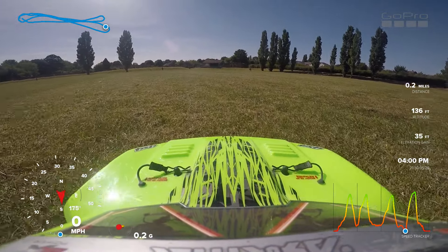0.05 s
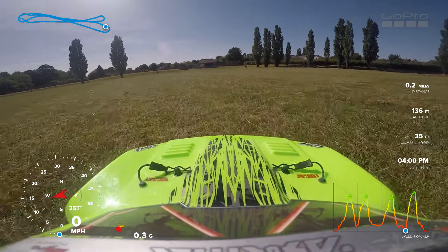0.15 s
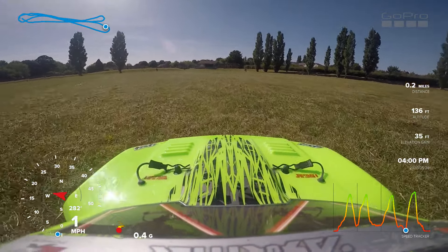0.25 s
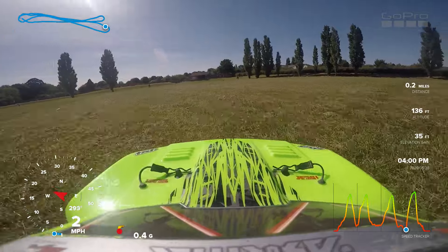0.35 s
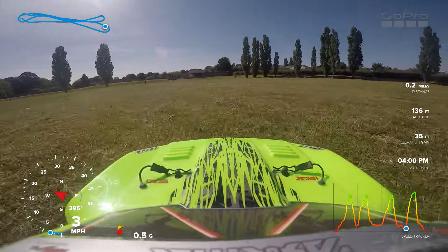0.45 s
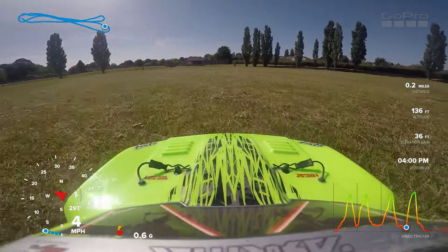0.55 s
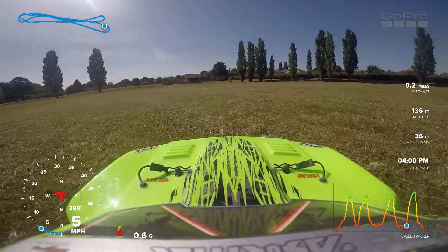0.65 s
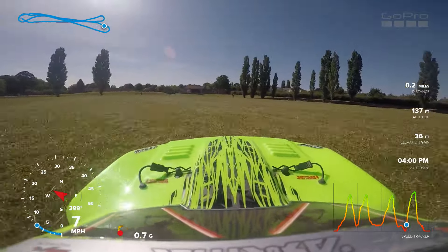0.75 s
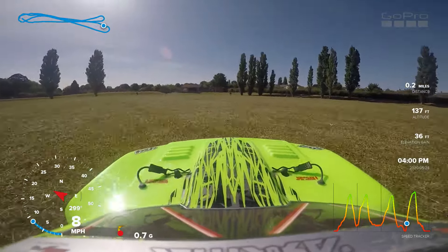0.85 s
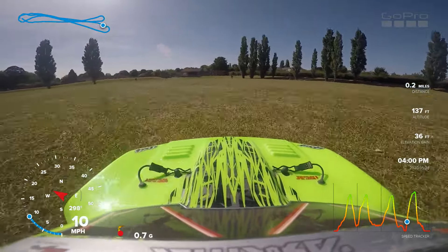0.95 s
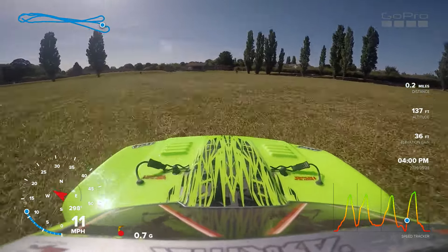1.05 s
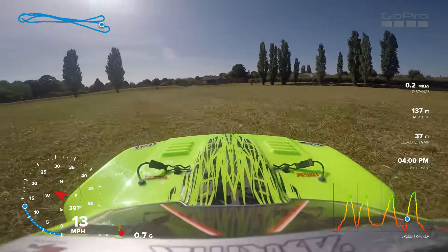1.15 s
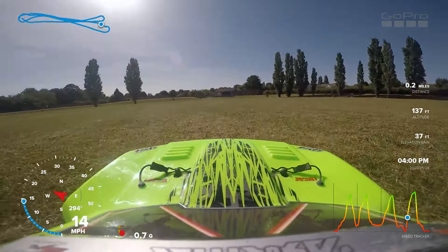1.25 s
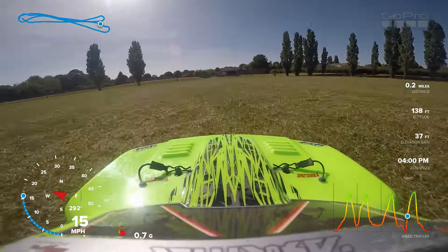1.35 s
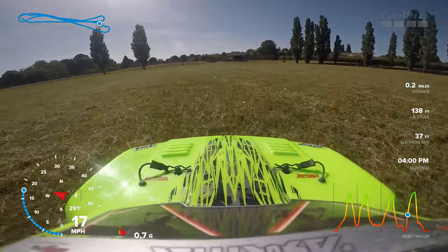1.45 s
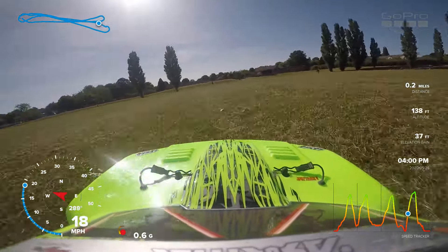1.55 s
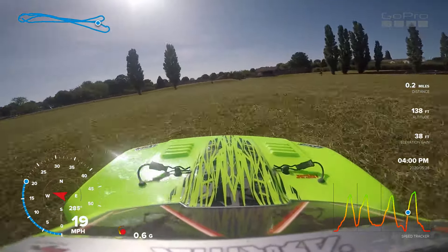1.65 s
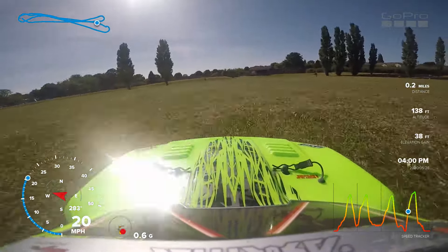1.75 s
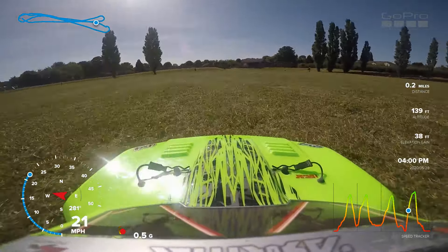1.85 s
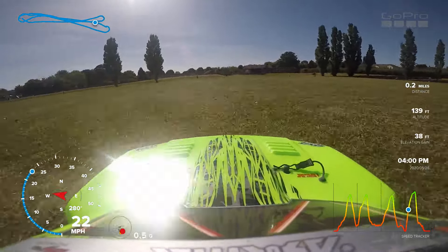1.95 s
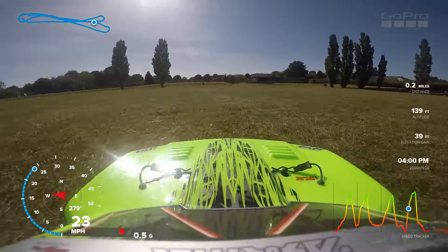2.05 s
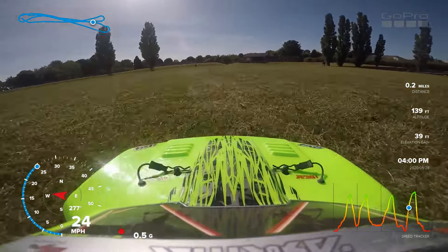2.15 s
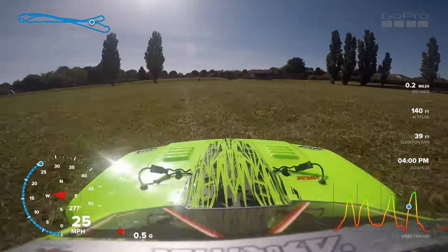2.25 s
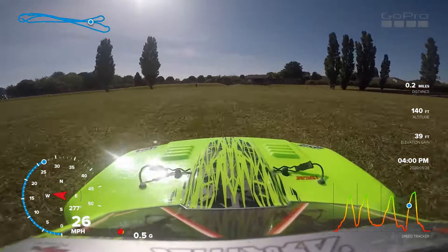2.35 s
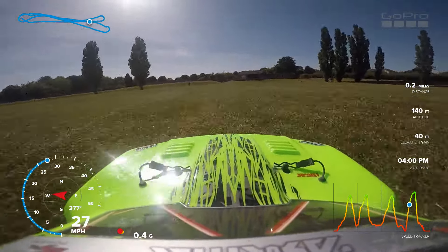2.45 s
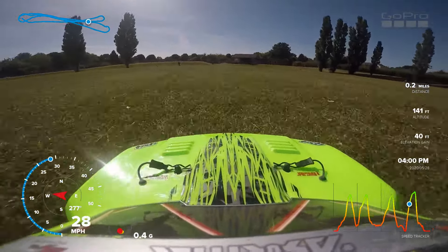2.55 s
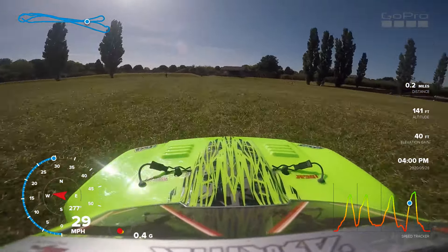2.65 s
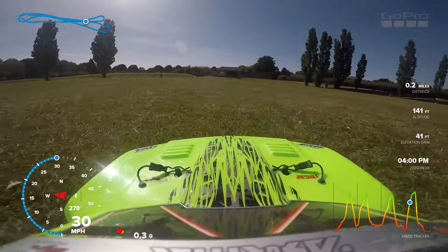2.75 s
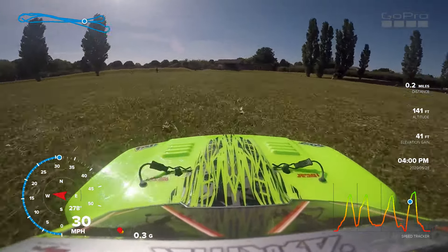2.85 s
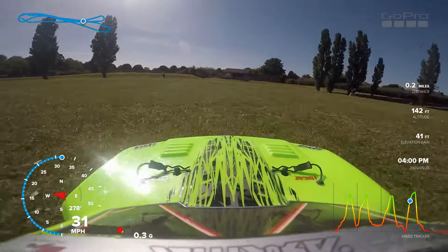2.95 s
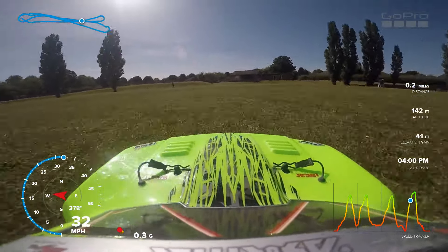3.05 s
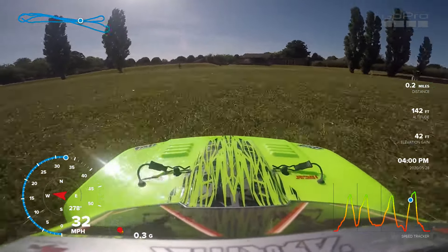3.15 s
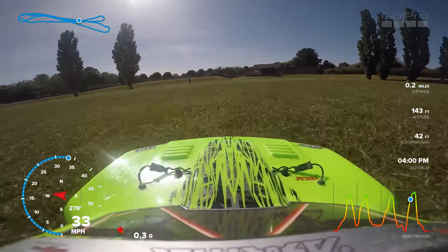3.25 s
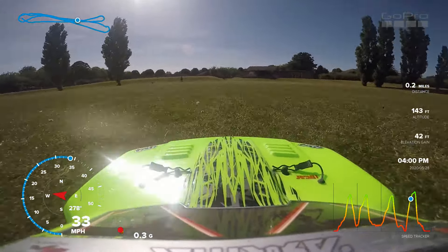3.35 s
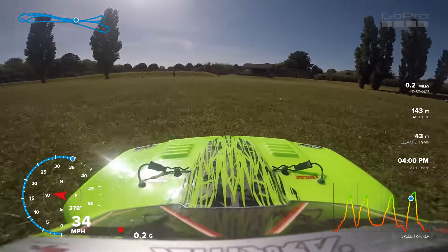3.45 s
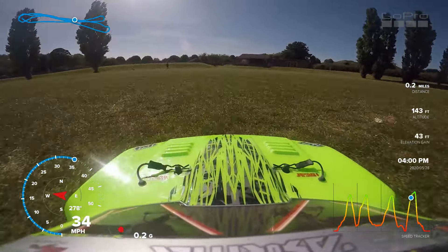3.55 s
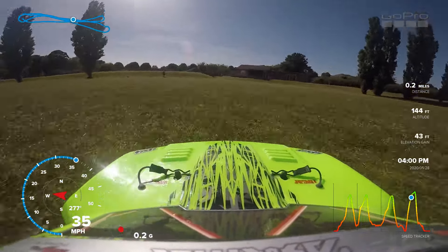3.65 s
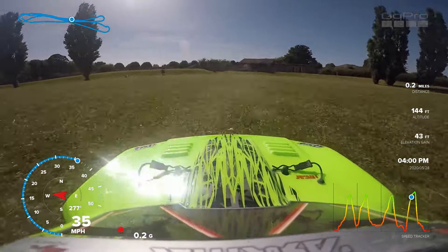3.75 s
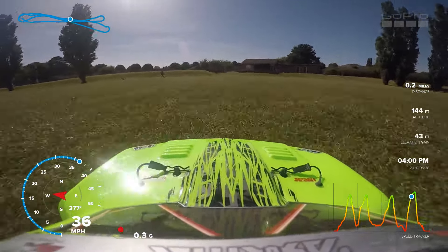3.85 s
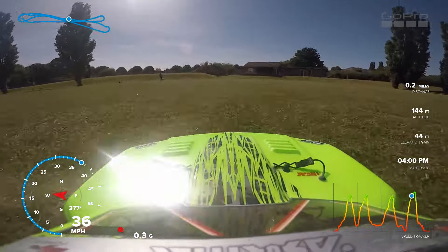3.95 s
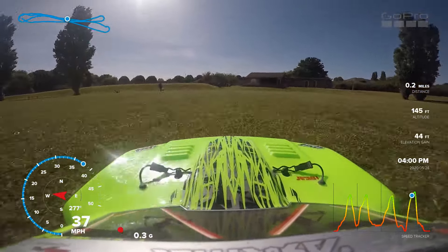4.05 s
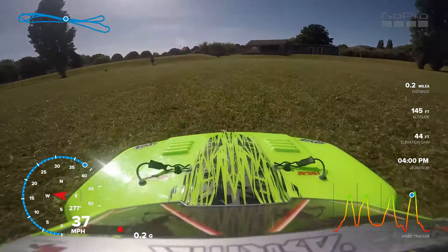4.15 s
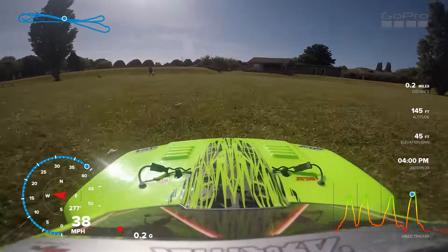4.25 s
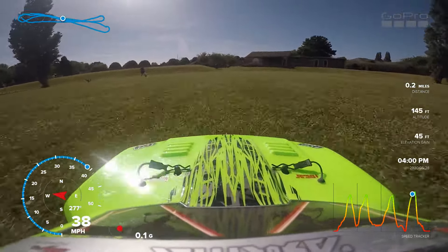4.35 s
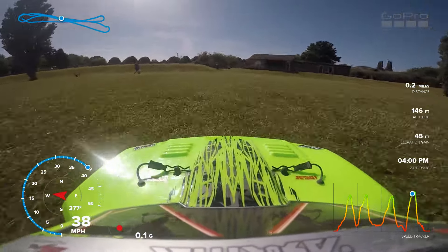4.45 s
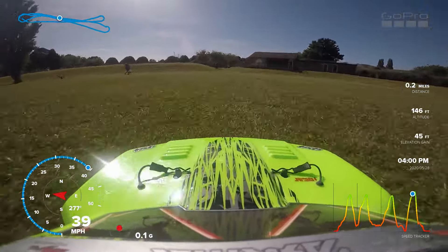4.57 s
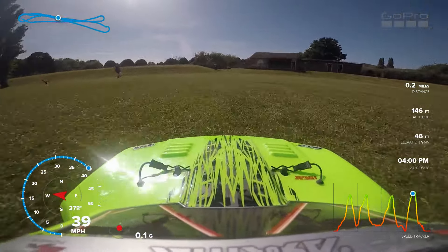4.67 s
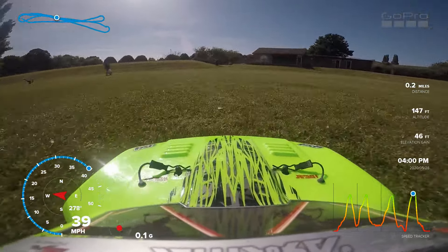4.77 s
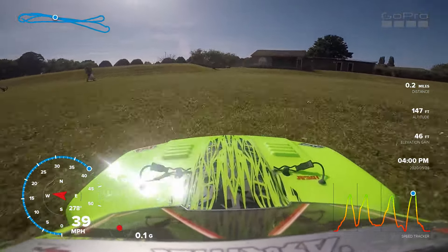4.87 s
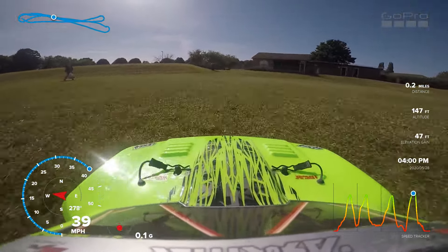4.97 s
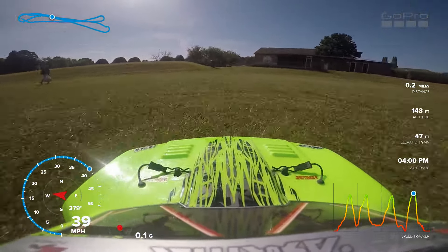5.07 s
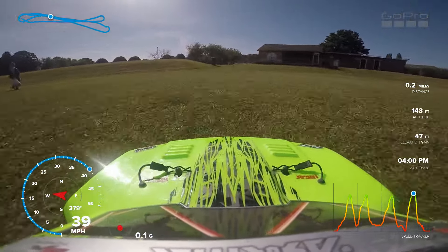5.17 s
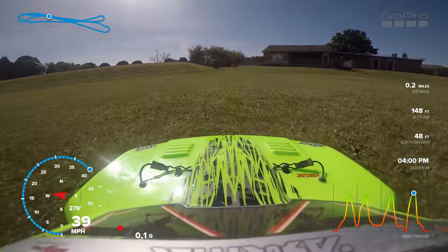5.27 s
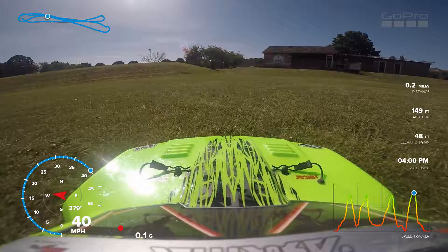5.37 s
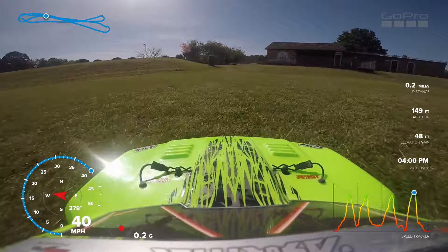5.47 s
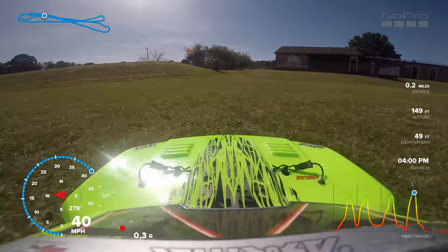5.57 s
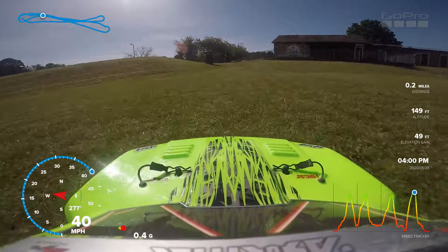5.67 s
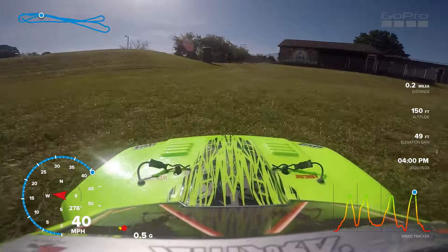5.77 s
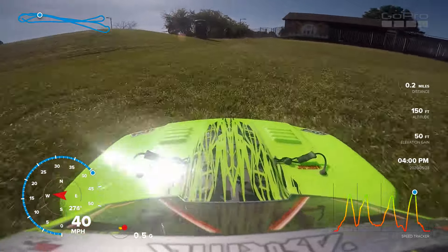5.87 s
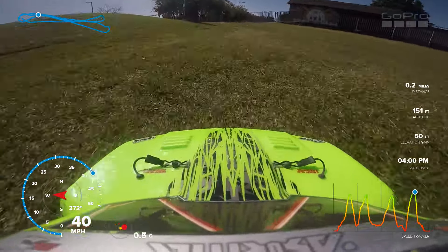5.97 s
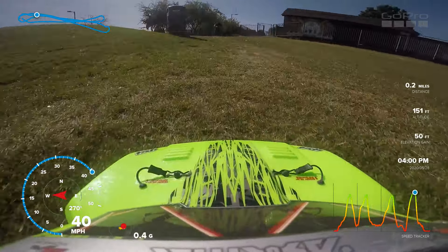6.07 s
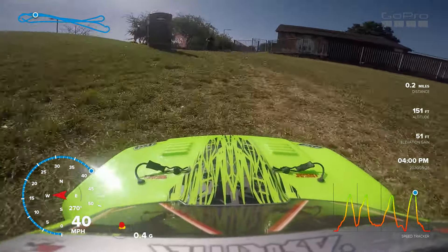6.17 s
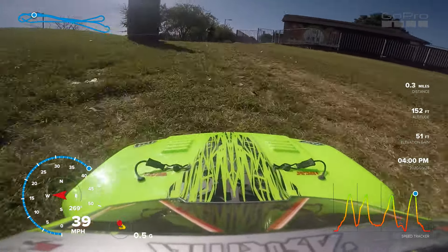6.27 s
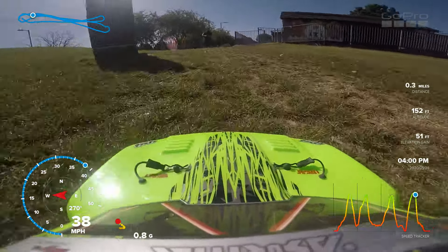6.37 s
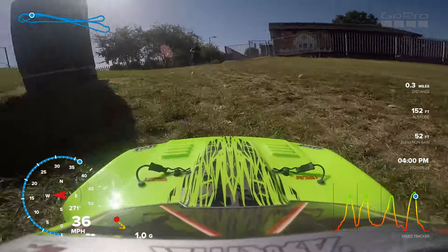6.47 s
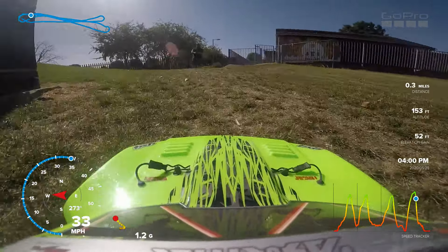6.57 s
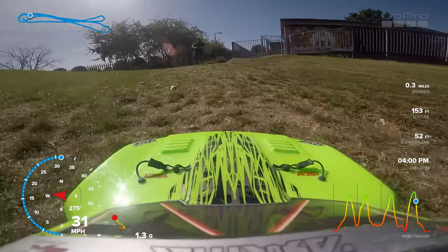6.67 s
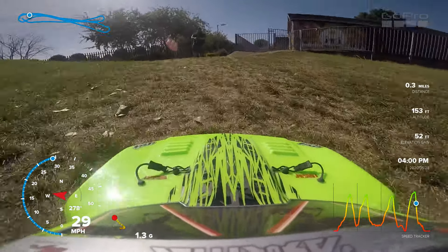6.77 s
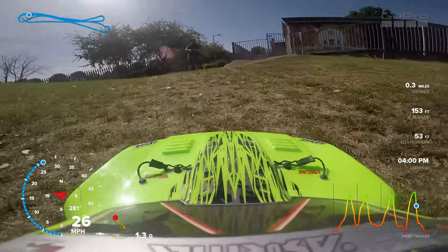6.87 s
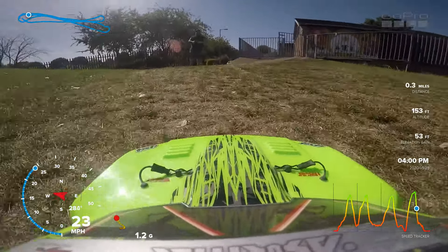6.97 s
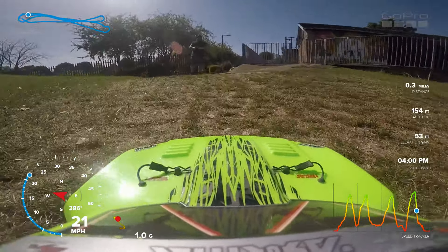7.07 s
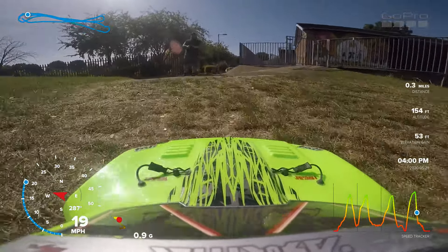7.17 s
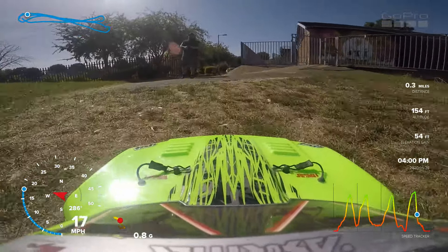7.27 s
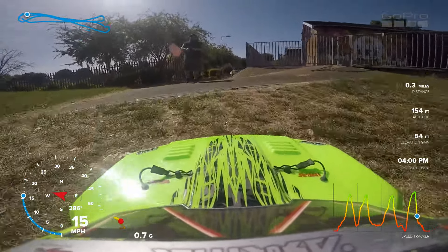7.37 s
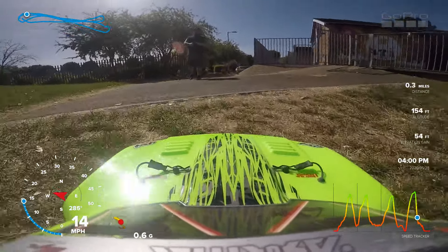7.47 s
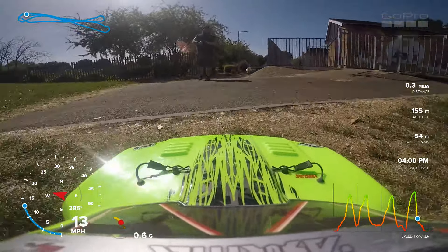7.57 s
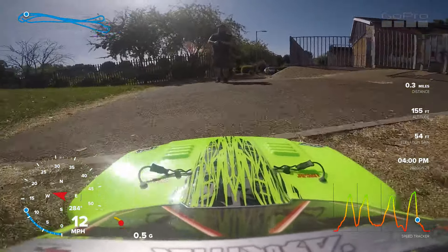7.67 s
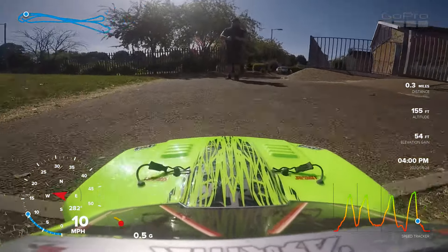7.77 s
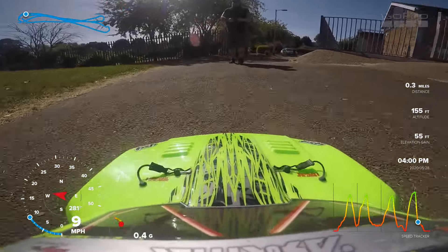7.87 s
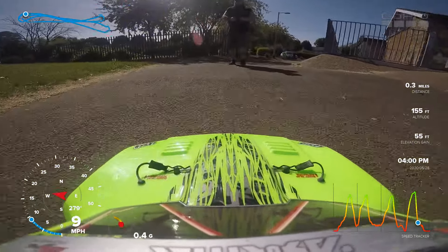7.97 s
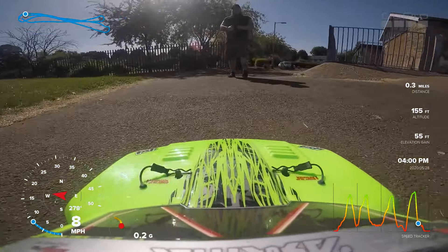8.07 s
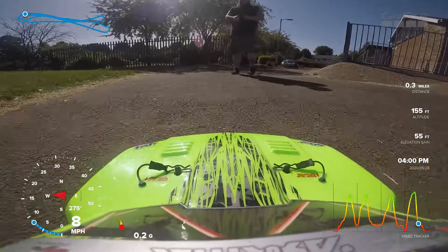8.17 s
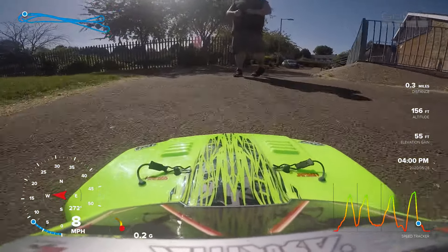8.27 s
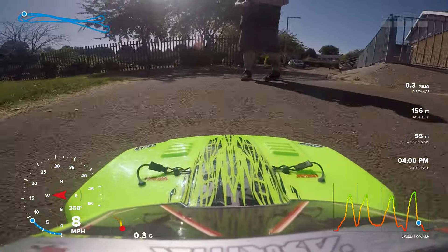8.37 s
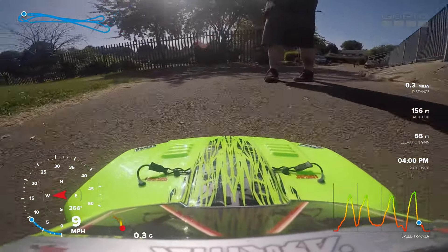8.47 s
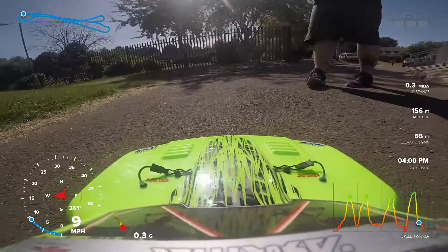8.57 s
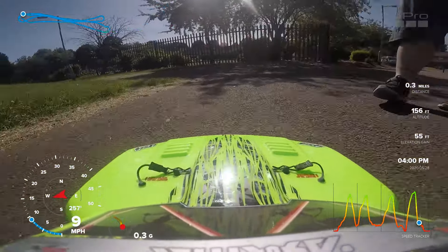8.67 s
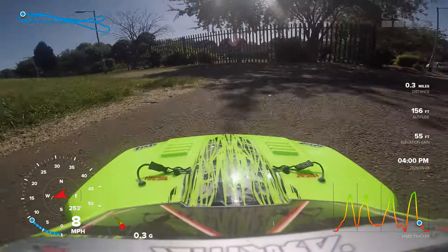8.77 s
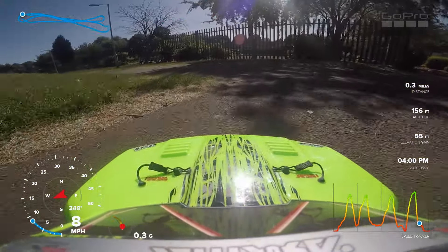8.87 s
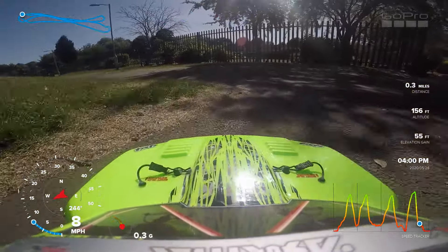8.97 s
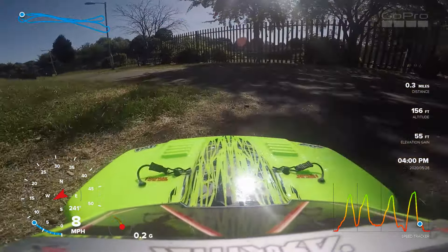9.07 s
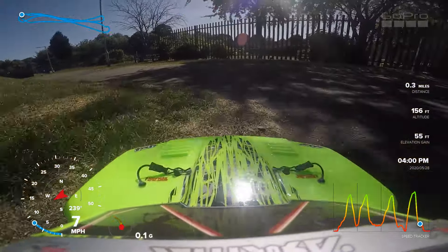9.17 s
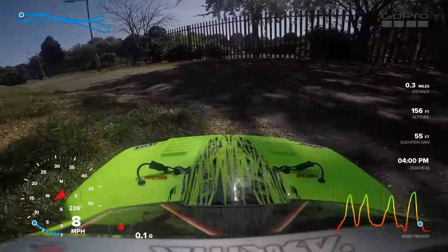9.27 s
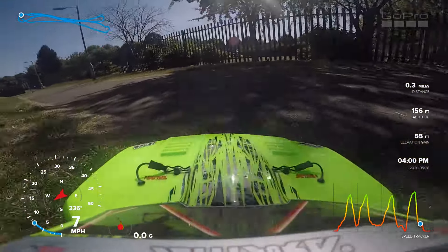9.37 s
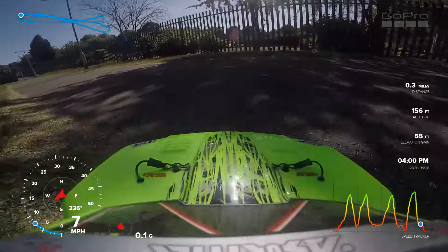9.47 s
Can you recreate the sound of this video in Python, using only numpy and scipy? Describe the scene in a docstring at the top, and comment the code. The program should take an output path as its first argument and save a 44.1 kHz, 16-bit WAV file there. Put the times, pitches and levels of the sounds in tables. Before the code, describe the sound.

A small electric remote-control truck whines and rattles over grass in buffeting wind, then brakes, thuds up a bank and rolls onto a hard path.

```python
"""A microphone rides on a small electric truck. The speed controller sings at launch and the gears whine
up as the wheels spin. Racing over grass, the suspension bounces, wind shakes the thin shell, and stalks
and grit rattle the chassis in clumps and knocks. Near 6 s the controller sings again under the brake,
and the truck thuds up a bank, its loose parts ticking. Near 8 s, with a brief growl, it rolls onto
a hard path where the tread hisses. A limiter holds the peaks throughout."""
import sys
import numpy as np
from scipy import signal
from scipy.io import wavfile
from scipy.ndimage import uniform_filter1d, minimum_filter1d

SR = 44100
rng = np.random.default_rng(int(sys.argv[2]) if len(sys.argv) > 2 else 0)


def unload_wav(signal):
    """Save mono or channel-first audio to the path in sys.argv[1] as 16-bit WAV at rate SR, clipped to [-1, 1]."""
    wavfile.write(
        sys.argv[1],
        SR,
        np.round(np.clip(np.atleast_2d(signal).T, -1, 1) * 32767).astype(np.int16),
    )


N = 419832
TIME_S = np.arange(N) / SR


def from_db(db):
    """Decibels to gain."""
    return 10 ** (np.asarray(db) / 20)


def curves(rows):
    """One automation curve for each column after the time column."""
    times, *columns = np.transpose(rows)
    return [np.interp(TIME_S, times, column) for column in columns]


def drift(rate_hz):
    """Random modulation: twice low-passed noise with a spread of 1."""
    pole = np.exp(-2 * np.pi * rate_hz / SR)
    slow = signal.lfilter([1], [1, -2 * pole, pole * pole], rng.standard_normal(N + SR))[SR:]
    return slow / slow.std()


def body(force, modes):
    """Parallel resonances, each passed twice so the valleys stay dark; white noise keeps its level."""
    inputs = np.array([force, signal.unit_impulse(N)]) + 1e-18
    out = 0
    for k, (hz, width_hz, level_db) in enumerate(modes):
        r = np.exp(-np.pi * width_hz / SR)
        band = [(1 - r * r) / 2, 0, (r * r - 1) / 2, 1, -2 * r * np.cos(2 * np.pi * hz / SR), r * r]
        out = out + (-1) ** k * from_db(level_db) * signal.sosfilt([band, band], inputs)
    sound, impulse_response = out
    return sound / np.sqrt(np.sum(impulse_response ** 2))


def shaking(level_db, modes, gust_db, gust_hz):
    """A gusty random force shakes a resonant body."""
    force = rng.standard_normal(N) * from_db(gust_db * drift(gust_hz))
    return from_db(level_db) * body(force, modes)


def grit(per_s, spread_db):
    """Stalks and grit strike at random moments with uneven force; rms 1."""
    sizes = from_db(spread_db * np.minimum(rng.exponential(1, N), 5)) * rng.choice([-1, 1], N)
    hits = sizes * (rng.random(N) < per_s / SR)
    return hits / hits.std()


def bursts(times_s, levels_db, half_rise_s):
    """An envelope of short blows, each swelling and dying away about as fast."""
    envelope = np.zeros(N)
    for time_s, level_db in zip(times_s, levels_db):
        start = round((time_s - half_rise_s) * SR)
        span = np.arange(max(start, 0), min(start + SR // 16, N))
        age = (span - start) / SR / (2 * half_rise_s)
        envelope[span] += from_db(level_db) * (age * np.exp(1 - age)) ** 4
    return envelope


def scattered_bursts(count, level_db, spread_db, rarity_floor, half_rise_s):
    """Blows at random moments around a level curve; the rarer, the harder, capped by the floor."""
    when, rarity = rng.random((count, 2)).T
    at = (when * (N - 1)).astype(int)
    accent_db = spread_db * (-np.log(rarity + rarity_floor) - 1)
    return bursts(at / SR, level_db[at] + accent_db, half_rise_s)


def rough_tone(rows, pitch_hz, level_db, wander, rough_db, rough_hz):
    """A tone whose pitch hunts and whose level breaks up; silent outside the time span of its rows."""
    phase = 2 * np.pi * np.cumsum(pitch_hz * (1 + wander * drift(rough_hz))) / SR
    gate = (TIME_S > rows[0][0]) & (TIME_S < rows[-1][0])
    return np.sqrt(2) * gate * from_db(level_db + rough_db * drift(rough_hz)) * np.sin(phase)


def struck(blows, modes, contact_hz, spread_db):
    """Each blow rings every mode with a strength of its own, dulled by a soft contact."""
    times_s, blow_db = np.transpose(blows)
    ring = 0
    for hz, mode_db, t60_s in modes:
        strength_db = blow_db + mode_db + rng.normal(0, spread_db, len(blows))
        clicks = np.full(N, 1e-18)
        clicks[(times_s * SR).astype(int)] = from_db(strength_db)
        r, angle = from_db(-60 / (t60_s * SR)), 2 * np.pi * hz / SR
        ring = ring + signal.lfilter([0, np.sin(angle)], [1, -2 * r * np.cos(angle), r * r], clicks)
    return signal.sosfilt(signal.butter(4, contact_hz, fs=SR, output="sos"), ring)


# Top-octave hiss: time_s, level_db
AIR = [(0.0, -60), (0.1, -64), (0.34, -56.5), (0.55, -59), (1.02, -68), (2.53, -71), (2.76, -65),
       (3.0, -69.5), (5.21, -69.5), (5.63, -65.5), (5.79, -63), (6.1, -84), (6.71, -88), (6.87, -77),
       (7.19, -85), (7.5, -74), (7.84, -80), (8.05, -64), (8.29, -75), (8.53, -75.5), (9.4, -68),
       (9.45, -65)]
# Bright ring of small clips: pitch_hz, width_hz, gain_db
CLIP_MODES = [(7460, 3400, -2.5), (10400, 2800, -14.5), (11470, 2400, -12)]


def air(clumps):
    """A fine hiss in the top octave that breathes with the bumps."""
    level_db, = curves(AIR)
    return body(from_db(level_db + clumps) * grit(14000, 2.2), CLIP_MODES)


# Hiss on the path: time_s, level_db
TREAD = [(8.25, -79), (8.45, -63), (8.68, -52), (8.95, -51), (9.25, -49.5), (9.52, -53)]
# Tyre colour: pitch_hz, width_hz, gain_db
TYRE_MODES = [(2200, 900, -1), (2900, 600, -1), (3560, 600, 0), (4150, 550, -6)]


def tread():
    """The tread hisses as the tyres roll onto the hard path."""
    level_db, = curves(TREAD)
    return shaking(level_db, TYRE_MODES, gust_db=1.5, gust_hz=20)


# The low bed: time_s, suspension_db, frame_db, shell_db, roof_db
RIDE = [(0.0, -26, -15.5, -26.5, -35), (0.1, -23.5, -34, -39.5, -36), (0.29, -15, -27, -23.5, -28.5),
        (0.4, -16.5, -34, -31.5, -39), (0.5, -28, -14.5, -21, -30.5), (0.76, -27, -21.5, -27.5, -29),
        (1.96, -22.5, -21, -23, -28.5), (2.64, -28, -23, -23.5, -28.5), (2.93, -23.5, -25, -35, -37),
        (3.01, -23, -33, -24.5, -31), (3.09, -27, -22.5, -28, -28.5), (3.83, -16.5, -30.5, -28.5, -25),
        (4.31, -34, -20, -20.5, -26.5), (5.29, -33.5, -27.5, -33.5, -33), (5.84, -17.5, -26, -26, -28),
        (6.08, -25, -28.5, -48, -45.5), (6.16, -24, -23, -40, -38.5), (6.85, -21.5, -24.5, -28.5, -36.5),
        (7.14, -35.5, -32, -39.5, -39), (7.35, -22.5, -29.5, -35, -43), (7.38, -21.5, -26, -30, -38.5),
        (8.39, -19.5, -26, -33.5, -32.5), (8.49, -28, -31.5, -44, -31.5), (8.73, -21.5, -28, -27.5, -34.5),
        (8.89, -24.5, -29.5, -40.5, -41), (9.5, -21.5, -23, -22.5, -28)]
# Resonances of those four parts: pitch_hz, width_hz, gain_db
SUSPENSION_MODES = [(19.3, 11, -7), (27.1, 9.6, 4), (38.9, 18.6, -2)]
FRAME_MODES = [(58.6, 21, -8), (81.8, 37, -6), (97.6, 44.5, -6.5), (124.7, 65.4, -9)]
SHELL_MODES = [(169.8, 25, -2), (196.7, 67, -4), (226.6, 63.6, -3)]
ROOF_MODES = [(269.1, 48, -1.5), (311.4, 36, -1.5), (347.3, 25, -7.5)]


def ride():
    """The suspension bounces, the frame shakes, and wind flutters the thin shell and roof."""
    suspension_db, frame_db, shell_db, roof_db = curves(RIDE)
    return (shaking(suspension_db, SUSPENSION_MODES, gust_db=3.1, gust_hz=5.1)
            + shaking(frame_db, FRAME_MODES, gust_db=0.1, gust_hz=12)
            + shaking(shell_db, SHELL_MODES, gust_db=1.47, gust_hz=13)
            + shaking(roof_db, ROOF_MODES, gust_db=3.0, gust_hz=27))


# Firm hums at speed: time_s, frame_db, shell_db, roof_db
HUM = [(0.3, -29, -41, -22), (0.44, -28, -41, -44), (0.56, -12.5, -22, -26), (0.62, -29, -46, -47),
       (1.06, -36, -28.5, -38), (1.62, -38, -22, -37), (1.77, -36, -36, -47), (1.87, -51, -32, -23.5),
       (2.2, -31, -24, -51), (2.3, -22, -41, -25), (2.38, -34, -39, -58), (2.42, -49, -22, -23),
       (2.51, -21.5, -29, -26.5), (2.93, -28, -41, -47.5), (3.04, -32.5, -33, -24), (3.26, -21, -39.5, -31),
       (3.51, -29, -17, -29), (3.74, -20.5, -46, -43), (4.06, -33, -20.5, -30.5), (5.24, -36, -31, -39.5),
       (5.78, -23.5, -32, -31.5), (5.86, -30, -42, -28), (5.97, -30, -52, -40), (6.1, -36, -52, -55)]
HUM_HZ, HUM_WIDTH_HZ = [104.26, 199.25, 309.4], [13.7, 14, 20.3]


def hum():
    """Narrow resonances kept humming by the ride; silent once the truck brakes."""
    fade_s = 0.05
    gate = np.clip(np.minimum(TIME_S - HUM[0][0], HUM[-1][0] - TIME_S) / fade_s, 0, 1)
    return gate * sum(shaking(level_db, [(hz, width_hz, 0)], gust_db=2.0, gust_hz=7.4)
                      for level_db, hz, width_hz in zip(curves(HUM), HUM_HZ, HUM_WIDTH_HZ))


# Low throb: time_s, pitch_hz, level_db
THROB = [(1.6, 56, -42), (2.4, 62, -38), (3.4, 84, -51), (4.6, 58, -27.5), (5.7, 61, -30.5), (6.4, 47, -43)]


def throb():
    """A rough low tone wanders and throbs at speed."""
    return rough_tone(THROB, *curves(THROB), wander=0.1, rough_db=5, rough_hz=8)


# Panel resonances: pitch_hz, width_hz, gain_db
DECK_MODES = [(679, 130, -8.5), (753, 330, -5.5)]
TUB_MODES = [(378, 100, 2), (473, 79, -4.5), (528, 172, -8)]


def panels(deck_db, tub_db):
    """Rolling makes the deck growl and the tub thud."""
    deck = shaking(deck_db, DECK_MODES, gust_db=1.0, gust_hz=20)
    return deck + shaking(tub_db, TUB_MODES, gust_db=1.7, gust_hz=24)


# Pulsing growl: time_s, pitch_hz, level_db
GROWL = [(8.06, 756, -50), (8.07, 777, -35), (8.094, 783, -28), (8.108, 777, -47), (8.135, 767, -35),
         (8.148, 799, -35), (8.17, 775, -25), (8.182, 780, -47), (8.19, 753, -29), (8.216, 763, -36),
         (8.228, 750, -50)]


def growl():
    """A pulsing growl near 780 Hz, probably the motor braking, as the truck reaches the path."""
    return rough_tone(GROWL, *curves(GROWL), wander=0.015, rough_db=2, rough_hz=60)


# Hard landings of the wheels: time_s, suspension_db, tub_db
LANDINGS = [(.29, -31, -49), (.58, -34, -25), (1.12, -13.5, -44), (1.59, -34, -33), (2.2, -20.5, -47),
            (3.34, -17, -34), (4.56, -22, -48), (5.01, -26, -49), (5.88, -20, -29), (6.439, -27, -29),
            (6.58, -21, -43), (7.32, -22, -57), (7.5, -29, -33), (7.85, -23.5, -41), (8.06, -24, -49),
            (8.35, -36, -39), (9.2, -13, -49)]


def landings():
    """Each landing is a short rough push into the suspension and the tub."""
    times_s, suspension_db, tub_db = np.transpose(LANDINGS)
    half_width_s = 0.025
    pushes = np.exp(-((TIME_S - times_s[:, None]) / half_width_s) ** 2)
    suspension_force = from_db(suspension_db) @ pushes * rng.standard_normal(N)
    tub_force = from_db(tub_db) @ pushes * rng.standard_normal(N)
    return body(suspension_force, SUSPENSION_MODES) + body(tub_force, TUB_MODES)


# Sharp hits on the shell and dull ones through the body: time_s, level_db
CRACKS = [(5.873, -33), (5.913, -27), (5.961, -27), (6.042, -43), (6.193, -40), (6.337, -32.5),
          (6.872, -42), (7.277, -46), (7.945, -35), (7.99, -39), (8.011, -28.5), (8.068, -32)]
THUDS = [(5.841, -22), (6.165, -20), (6.184, -15.5), (6.377, -16), (6.385, -16), (6.443, -15), (6.514, -21)]
# Their ring-outs: pitch_hz, gain_db, t60_s
CRACK_RING = [(1130, -5, .06), (1430, -5, .05), (1800, 0, .08), (2000, -3, .05), (2380, -8, .06)]
THUD_RING = [(147, -4.5, 0.11), (215.6, -4, .1), (298, -10, 0.063), (406.6, -13, 0.088)]


def impacts():
    """The hardest blows set the shell ringing, and the bumps of the bank thud through the body."""
    cracks = struck(CRACKS, CRACK_RING, contact_hz=2800, spread_db=3.0)
    return cracks + struck(THUDS, THUD_RING, contact_hz=700, spread_db=1.5)


# Switching tones: start_s, end_s, pitch_hz, level_db, octave_above_db
SWITCHING = [(.018, 0.104, 3970, -40, -82), (6.057, 6.403, 996, -44, -66), (7.935, 8.035, 7940, -74, -90)]


def controller():
    """The controller sings in the windings: sharply gated tones whose level flutters at random."""
    fade_s, tones = 0.0055, 0
    for start_s, end_s, pitch_hz, level_db, octave_db in SWITCHING:
        gate = np.clip(np.minimum(TIME_S - start_s, end_s - TIME_S) / fade_s, 0, 1)
        phase = 2 * np.pi * pitch_hz * TIME_S
        tones += gate * (from_db(level_db) * np.sin(phase) + from_db(octave_db) * np.sin(2 * phase))
    return np.sqrt(2) * tones * from_db(2.5 * drift(40))


# Gear train under load: time_s, mesh_hz, mesh_db, whine_db, unsteadiness_ratio
GEARS = [(.05, 283, -65, -54, .012), (.085, 333, -69, -27, .012), (.1, 368, -66, -42, .012),
         (.12, 488, -61, -49, 0.015), (.14, 649, -52, -34, 0.015), (.155, 757, -28, -30, .012),
         (.17, 922, -38, -40, 0.013), (.2, 1032, -28, -45, .012), (.23, 1198, -31, -45, 0.014),
         (.26, 1323, -33, -39, .012), (.29, 1350, -31, -57, 0.01), (.33, 1450, -53, -90, 0.013),
         (.395, 1720, -53, -90, 0.014), (.41, 1830, -29.5, -92, 0.013), (.46, 2060, -31, -91, 0.017),
         (.62, 1984, -40, -92, 0.012), (.7, 1920, -44, -89, 0.0285), (1.5, 1960, -43, -86, 0.028),
         (2.2, 2018, -43, -86, 0.025), (4.4, 1999, -50.5, -86, 0.028), (5.2, 1983, -47, -90, 0.011),
         (5.945, 1992, -48, -92, .012), (5.97, 1976, -25, -90, 0.018), (6.0, 1940, -42, -90, 0.018)]
# Revs as the tyres skip: time_s, top_hz, top_db, half_width_s
SKIPS = [(0.822, 2070, -35, .06), (1.0, 2160, -38.5, 0.072), (1.243, 2245, -39, 0.1),
         (1.439, 2347, -44, 0.049), (1.779, 2280, -38.5, 0.089), (2.042, 2380, -39, 0.056),
         (2.409, 2350, -44, 0.066), (2.551, 2286, -68, .04), (2.73, 2273, -44.5, 0.071),
         (3.019, 2366, -41, 0.053), (3.42, 2330, -43.5, 0.09), (3.789, 2300, -46, 0.058),
         (3.99, 2393, -47, .04), (4.801, 2328, -59, 0.074), (5.02, 2270, -53, .06), (5.2, 2280, -44, 0.069),
         (5.39, 2360, -45.5, 0.051), (5.57, 2378, -40, 0.068), (5.769, 2300, -44, .06)]
WHINE_PER_MESH = 4.1


def gears():
    """The motor whines and plastic teeth with play rasp; the mesh revs up and falls back at each skip."""
    mesh_hz, mesh_db, whine_db, unsteadiness = curves(GEARS)
    whine_hz = WHINE_PER_MESH * mesh_hz
    whine = rough_tone(GEARS, whine_hz, whine_db, wander=0.022, rough_db=3.5, rough_hz=180)
    for time_s, top_hz, top_db, half_width_s in SKIPS:
        rev = np.exp(-np.abs((TIME_S - time_s) / half_width_s) ** 3)
        mesh_hz += rev * (top_hz - mesh_hz)
        mesh_db += rev * (top_db - mesh_db)
    mesh_hz *= 1 + 0.015 * drift(20)
    mesh = rough_tone(GEARS, mesh_hz, mesh_db, wander=1.1 * unsteadiness, rough_db=4, rough_hz=150)
    return mesh + whine


# Ring of the small fittings: pitch_hz, width_hz, gain_db
FITTING_MODES = [(3360, 1530, 0.5), (4250, 2130, -5), (5000, 1100, -0.5), (6120, 390, -12),
                 (6480, 350, -6.5), (6870, 500, -15.5)]


def fittings(envelope, loose_db):
    """Small fittings buzz under a dense spray of grit, while loose parts add sparser ticks."""
    loose = from_db(loose_db) * grit(per_s=1500, spread_db=4.0)
    spray = from_db(drift(30)) * grit(per_s=15000, spread_db=1.7)
    return body(envelope * (spray + loose), FITTING_MODES)


# The hardest knocks: time_s, drive_db, arms_offset_db
KNOCKS = [(0.263, -19, -14), (0.358, -11, -11), (0.41, -33, -6), (0.485, -18, -9), (0.525, -26, -6),
          (0.594, -26, -5), (0.667, -23, -4), (0.737, -34, -9), (0.772, -26, -2), (0.898, -16, 1),
          (1.31, -36, -7), (1.357, -33, -19), (1.643, -29, 1), (1.935, -17, -14), (1.984, -15, -12),
          (2.168, -33, -12), (2.212, -24, 3), (2.258, -35, -16), (2.354, -33, -1), (2.569, -39, -12),
          (2.699, -38, -6), (2.769, -32, 11), (3.085, -29, -2), (3.226, -31, 8), (3.295, -29, 5),
          (3.346, -19, -1), (3.39, -21, -10), (3.562, -37, -16), (3.641, -39, -12), (3.725, -25, -3),
          (3.864, -24, -2), (3.93, -24, -8), (3.961, -18, -24), (4.116, -28, 3), (4.149, -20, -27),
          (4.222, -38, -15), (4.508, -30, 6), (4.765, -33, -14), (4.84, -26, -3), (4.976, -19, -12),
          (5.097, -22, -10), (5.191, -28, 3), (5.226, -32, 8), (5.51, -25, -11), (5.677, -40, -8),
          (5.758, -24, -4), (5.874, -9, -10), (5.888, -24, -17), (5.912, -12, 1), (5.961, -7.5, -15),
          (6.038, -11, -24), (6.09, -23, -5), (6.193, -9, -23), (6.338, -13, -15), (6.36, -13, -16),
          (6.385, -18, -16), (6.443, -18, -19), (6.718, -21.5, -1.5), (6.752, -14, -33), (6.775, -31, -23),
          (6.82, -23, -6), (6.848, -36, -14), (6.871, -26, -6), (6.902, -34, -9), (6.93, -23, -8),
          (6.975, -33, -15), (7.016, -29, -10), (7.278, -24, -4), (7.407, -16, -11), (7.43, -19, -8),
          (7.452, -26, -16), (7.5, -10.5, -14), (7.562, -31, 4), (7.625, -16, -12), (7.648, -31, -12),
          (7.728, -12.5, -14), (7.757, -22, 0), (7.811, -12, -15), (7.887, -14, -8), (7.949, -30, -7),
          (7.99, -27, 3), (8.012, -18, -1), (8.068, -13, -29), (8.1, -18, -17), (8.13, -19, -18),
          (8.158, -23, -19), (8.307, -18, -37), (9.286, -22, 5), (9.308, -13, -4), (9.411, -8, -20)]
# Ring of the chassis and upper arms: pitch_hz, width_hz, gain_db
CHASSIS_MODES = [(608, 360, -6.5), (1010, 340, -5), (1300, 360, -2.5), (1520, 190, -11)]
ARM_MODES = [(1643, 570, 5), (2037, 545, 4.5), (2294, 304, 7.5), (2604, 1440, -5)]


def chassis(shaken, ticks):
    """Shaking and knocks make the chassis and its upper arms clatter; ticks also shake the arms."""
    times_s, drive_db, arms_offset_db = np.transpose(KNOCKS)
    knocks = bursts(times_s, drive_db - 21.5, half_rise_s=0.0052)
    arm_knocks = bursts(times_s, drive_db + arms_offset_db - 14.5, half_rise_s=0.0052)
    clatter = body((shaken + knocks) * grit(16000, 2.23), CHASSIS_MODES)
    arms = body((shaken + arm_knocks + from_db(-3) * ticks) * grit(16000, 1.15), ARM_MODES)
    return clatter + arms


# Rolling rattle: time_s, drive_db, treble_offset_db, deck_db, tub_db
ROLL = [(0, -30, -17, -30, -25.5), (.08, -34, -16, -43, -36), (.29, -27.5, -11.5, -35, -31),
        (.48, -26.5, -13, -33.5, -28), (.85, -34.5, -9.5, -43, -36), (.93, -33, -12.5, -36.5, -32.5),
        (1.83, -35, -9, -43.5, -34), (1.96, -32, -13, -34.5, -33.5), (2.76, -35.5, -12.5, -40, -35.5),
        (3.4, -33, -12, -37, -36), (4.15, -34.5, -13, -39, -36), (4.7, -36, -12.5, -40.5, -37.5),
        (5.2, -36, -11, -42.5, -39), (5.83, -32, -13, -39, -35.5), (5.96, -32, -9.5, -31, -33),
        (6.07, -36.5, -10, -51, -43), (6.2, -35, -25, -39, -37), (6.28, -37.5, -21, -43, -44),
        (6.42, -34.5, -25, -38, -31), (6.63, -41, -20.5, -44.5, -39.5), (6.92, -35.5, -19.5, -43, -37),
        (7.11, -44, -24.5, -48, -40), (7.37, -42, -22.5, -53, -41.5), (7.42, -42, -17.5, -42, -32),
        (7.64, -39, -19, -46, -36), (7.69, -49, -17, -50, -45), (7.79, -41, -16, -43, -31),
        (7.98, -35.5, -18, -43, -40), (8.015, -32, -15, -33, -28), (8.06, -31, -13, -37, -35),
        (8.12, -28.5, -11, -31.5, -32), (8.2, -36.5, -11, -34, -30.5), (8.3, -38, -16, -41, -39.5),
        (8.51, -45.5, -11, -42, -34.5), (8.9, -40.5, -13, -40.5, -37.5), (9.27, -38.5, -14, -41, -31.5),
        (9.36, -33, -14.5, -42, -33), (9.52, -31, -10, -45, -30.5)]
# Loose parts against the treble rattle, hidden at speed and bare as the truck slows: time_s, offset_db
LOOSE = [(0, 2.5), (1, -9), (5.9, -19.5), (6.2, -6), (7.2, 10), (7.9, 1.5), (8.2, -7.5), (8.4, -17),
         (9.25, -16), (9.35, -8)]
# The loudest dry ticks of grit and fittings: time_s, drive_db, top_octave_offset_db
TICKS = [(0.3349, -24.5, -27), (0.3618, -36, -30), (0.388, -36, -27), (0.492, -21, -25), (0.5628, -44, -28),
         (0.6461, -19, -17), (0.7, -27.5, -5.5), (0.8957, -33, -25), (0.9188, -27, -19), (1.247, -28, -36),
         (1.9516, -28, -26), (1.997, -28.5, -41), (2.044, -32, -33), (2.092, -49, -34), (2.208, -35, -32),
         (2.258, -32, -32), (2.355, -42, -32), (2.77, -36, -30), (2.926, -32, -21), (3.09, -35, -32),
         (3.405, -35, -32), (3.93, -33, -34), (4.065, -31, -24), (4.253, -40, -33), (4.375, -41, -30),
         (4.77, -46, -26), (5.9392, -29, -33), (6.411, -35, -30), (6.4378, -42, -14), (6.5086, -47, -33),
         (6.549, -35, -40), (6.609, -36, -34), (6.7769, -37.5, -27), (6.8139, -33, -34), (6.8466, -33, -34),
         (6.901, -34, -39), (6.928, -34, -33), (6.972, -34, -32), (6.996, -43, -24), (7.018, -30, -32),
         (7.0518, -37, -31), (7.15, -40, -30), (7.1905, -39, -28), (7.2125, -39, -30), (7.305, -38, -32),
         (7.3387, -40, -22), (7.385, -35, -22), (7.412, -26.5, -22), (7.443, -38, -28), (7.462, -49, -26),
         (7.489, -33, -32), (7.5424, -27.5, -38), (7.5841, -29, -36), (7.6216, -38, -35),
         (7.7035, -38, -28), (7.734, -30, -37), (7.7593, -40, -32), (7.79, -32, -30), (7.8067, -33, -30),
         (7.823, -26, -26), (7.848, -37, -32), (7.881, -26.5, -25), (7.9185, -55, -30), (7.953, -31, -27),
         (8.009, -26, -32), (8.038, -27, -29), (8.2266, -34, -33), (8.256, -33, -34), (8.3622, -30, -24),
         (8.475, -38, -29), (8.7352, -28.5, -37), (8.828, -35, -28), (8.91, -36, -26), (8.996, -36, -26),
         (9.196, -36, -28), (9.242, -45, -30), (9.3097, -29, -30), (9.34, -24.5, -30), (9.413, -22.5, -28),
         (9.436, -24, -28), (9.467, -23, -25)]
# Ring of the grit: pitch_hz, width_hz, gain_db
STONE_MODES = [(3150, 1520, 4.5), (4300, 420, -3), (4890, 710, 2), (5960, 710, -9.5), (6430, 200, 2.5)]


def rattle():
    """Grass and grit rattle the truck in clumps that follow the bumps, with jolts and ticks on top."""
    drive_db, treble_db, deck_db, tub_db = curves(ROLL)
    loose_db, = curves(LOOSE)
    strays = scattered_bursts(900, drive_db + treble_db + loose_db,
                              spread_db=1.6, rarity_floor=0.02, half_rise_s=0.0013)
    clumps = 0.85 * drift(3.0) + 0.27 * drift(51)
    jolts = scattered_bursts(1100, drive_db - 12, spread_db=1.0, rarity_floor=0.03, half_rise_s=0.0022)
    shaken = from_db(drive_db - 9.0 + 2.0 * clumps) + jolts
    treble = from_db(drive_db + treble_db - 6.5 + 1.8 * clumps) + from_db(treble_db - 7.5) * jolts

    tick_s, tick_db, top_db = np.transpose(TICKS)
    ticks = bursts(tick_s, tick_db - 11.0, half_rise_s=0.0024) + strays
    top_ticks = bursts(tick_s, tick_db + top_db - 7.0, half_rise_s=0.0024) + from_db(-26.5) * strays

    clatter = chassis(shaken, ticks) + fittings(treble, loose_db)
    stones = body(ticks * grit(20000, 2.6), STONE_MODES)
    bed = air(clumps) + panels(deck_db, tub_db)
    clips = body(top_ticks * grit(16000, 5.8), CLIP_MODES)
    return bed + clatter + stones + clips


def scene():
    """Everything reaches the microphone through the chassis, dry and mono."""
    mix = (ride() + tread() + impacts() + growl() + hum() + landings()
           + rattle() + gears() + throb() + controller())
    return mix[None]


def record(dry):
    """A limiter squeezes what passes its knee and lets go steadily; the top is cut."""
    knee, squeeze, release_db_per_s, cutoff_hz = 0.385, 0.89, 147, 13200
    window = 89  # samples, centred: a millisecond of look-ahead
    over_db = squeeze * np.maximum(20 * np.log10(np.abs(dry) / knee + 1e-9), 0)
    release_ramp = release_db_per_s * TIME_S
    held_db = np.maximum.accumulate(over_db + release_ramp, axis=1) - release_ramp
    early_db = -minimum_filter1d(-held_db, size=window, axis=1)
    limited = dry * from_db(-uniform_filter1d(early_db, size=window, axis=1))
    return signal.sosfilt(signal.cheby2(10, 60, cutoff_hz, fs=SR, output="sos"), limited)


dry = scene()
out = record(dry)
unload_wav(out)
```